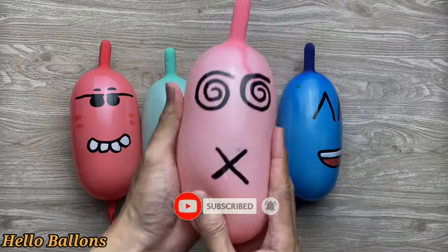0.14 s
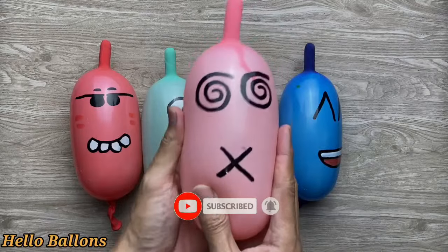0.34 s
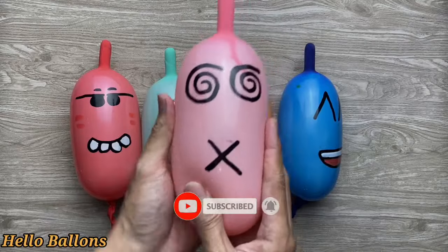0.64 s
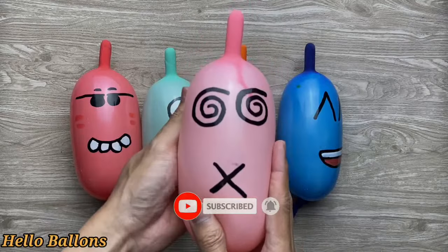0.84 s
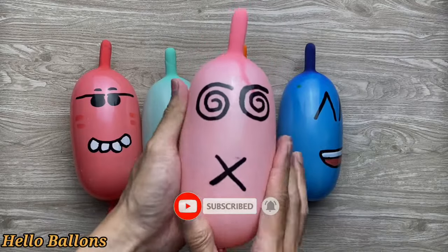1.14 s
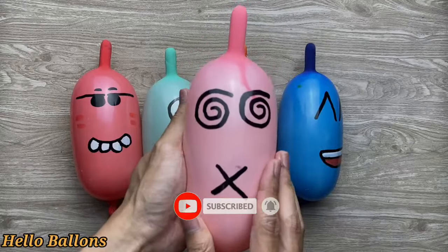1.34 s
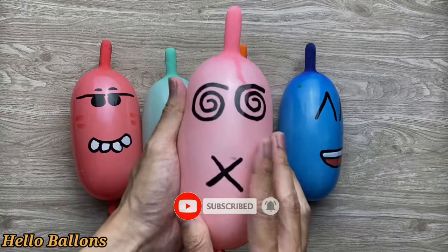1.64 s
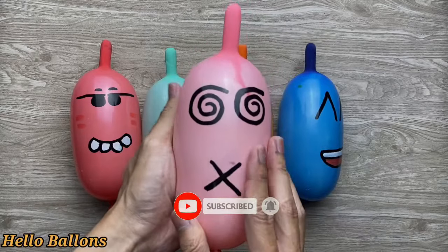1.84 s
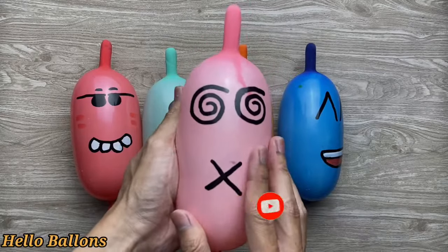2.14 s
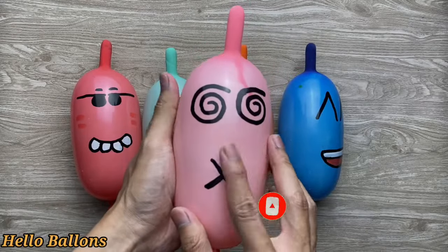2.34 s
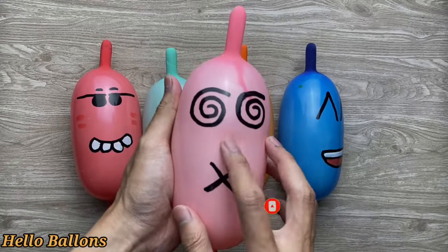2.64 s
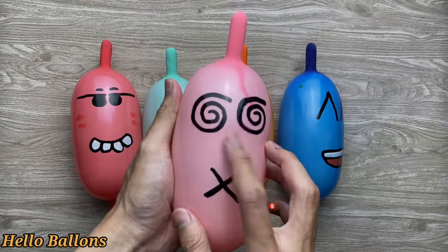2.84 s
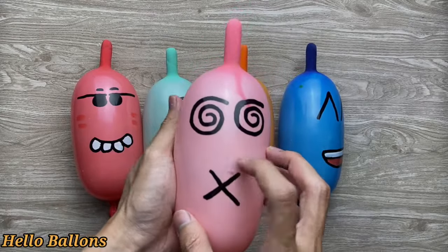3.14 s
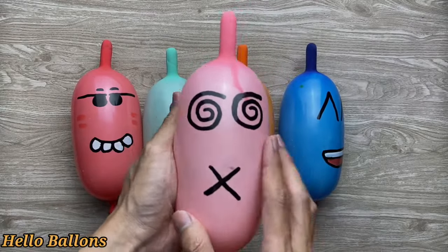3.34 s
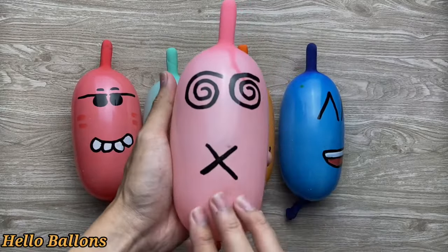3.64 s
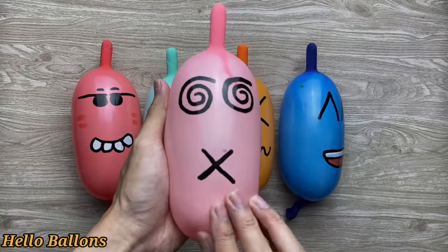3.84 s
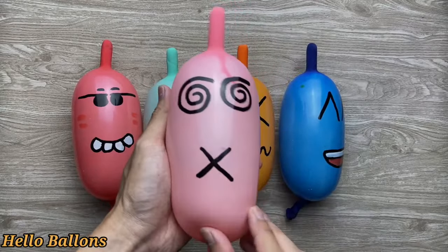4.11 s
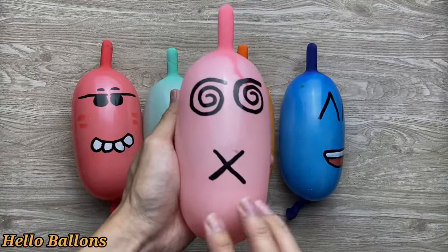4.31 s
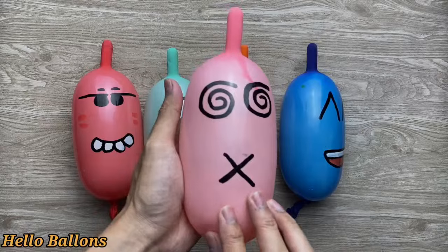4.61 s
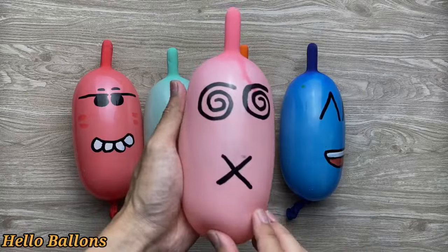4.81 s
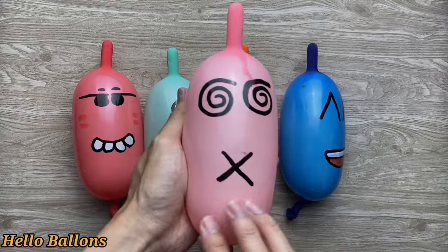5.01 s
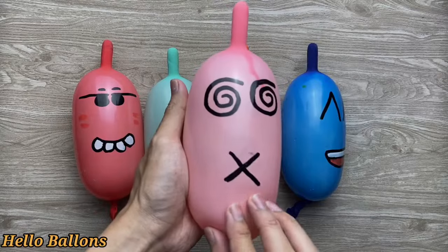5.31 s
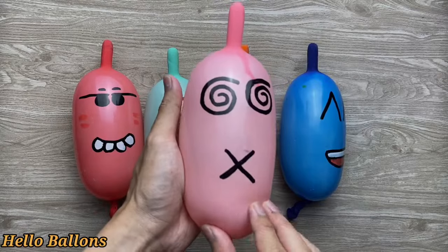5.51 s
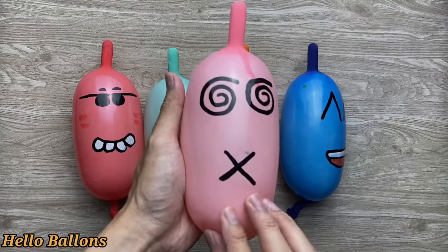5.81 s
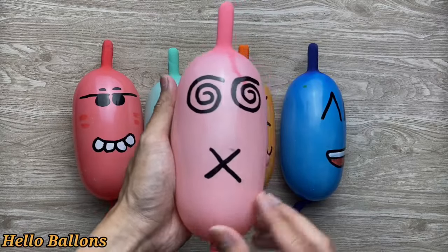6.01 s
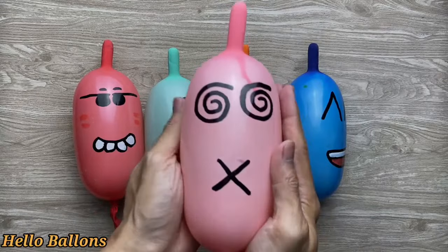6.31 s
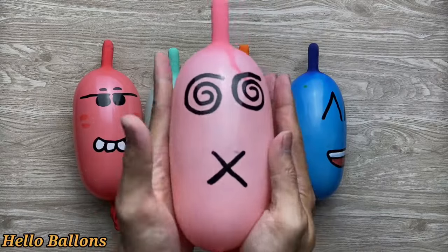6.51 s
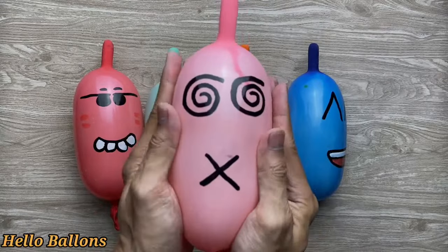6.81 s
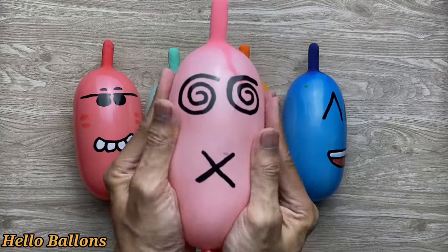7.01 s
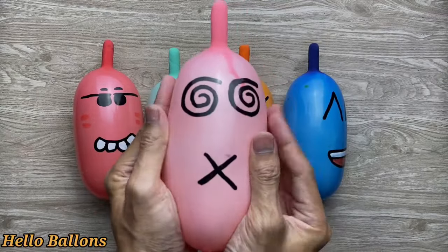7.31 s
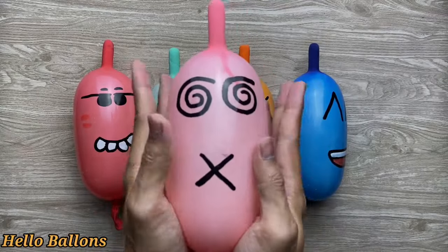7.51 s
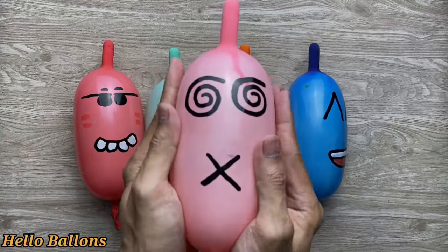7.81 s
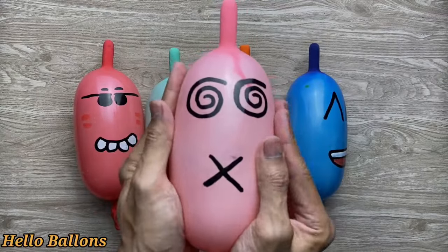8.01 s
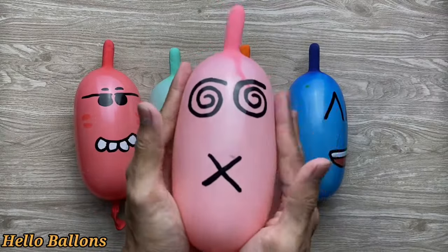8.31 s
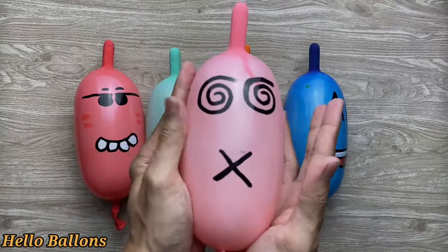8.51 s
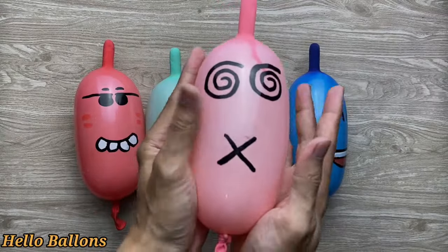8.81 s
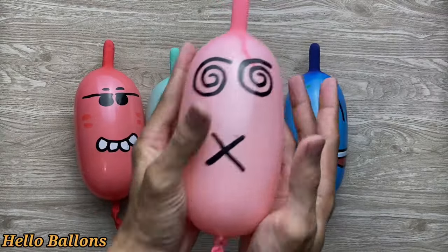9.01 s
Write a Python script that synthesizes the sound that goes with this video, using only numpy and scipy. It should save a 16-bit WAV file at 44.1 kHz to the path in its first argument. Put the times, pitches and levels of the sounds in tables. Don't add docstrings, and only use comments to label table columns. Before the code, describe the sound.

Hands rub, tap and squeeze a taut, filled latex balloon up close, with hollow thumps, rubbery squeaks, creaks and dry friction in a small room.

```python
import sys
import numpy as np
from scipy import signal
from scipy.fft import rfft, irfft, next_fast_len
from scipy.io import wavfile
from scipy.ndimage import uniform_filter1d

SR = 44100
rng = np.random.default_rng(int(sys.argv[2]) if len(sys.argv) > 2 else 0)


def store_pcm(level_fs):
    pcm = np.round(np.clip(level_fs, -1, 1) * 32767).astype(np.int16)
    wavfile.write(sys.argv[1], SR, np.atleast_2d(pcm).T)


def makeup_ratio(level_db):
    decades = np.asarray(level_db, float) / 20
    return 10 ** decades


N = 403497
SIZE = 8192


def on_log(hz, table):
    f, value = np.transpose(table)
    return np.interp(np.log(hz + 1), np.log(f + 1), value)


def unit(x):
    return x / np.sqrt(np.mean(x ** 2))


def walk(rate):
    hold = int(SR / rate)
    steps = np.repeat(rng.standard_normal(N)[:N // hold + 1], hold)
    return unit(uniform_filter1d(steps, hold // 2 + 1)[:N])


# (f/Hz, level/dB per Hz)
HUM_COLOUR = [(18, -28), (30, 7.5), (276, -13.5), (456, -14), (636, -15), (1100, -37.5), (9000, -54),
              (11700, -74.5), (19800, -120)]


def hum():
    hz = np.fft.rfftfreq(N, 1 / SR)
    colour = makeup_ratio(on_log(hz, HUM_COLOUR)) * np.clip((hz - 30) / 15, 0, 1) ** 2
    mid, side = rfft(rng.standard_normal((2, N))) * colour
    side = side * np.clip(hz / 2500 + 0.26, 0, 1)
    level_db = -53.5 + 0.58 * walk(36)
    return unit(irfft(np.array([mid + side, mid - side]), N)) * makeup_ratio(level_db)


# (f/Hz, fade/s)
ROOM_FADE = [(80, .3), (500, .16), (2000, .2)]


def room(x):
    room_db = -19
    t = np.arange(2 * SIZE) / SR
    tail = 0
    for hz in 88 * 2. ** np.arange(8):
        band = signal.butter(2, [hz / 2 ** .5, hz * 2 ** .5], "band", fs=SR, output="sos")
        noise = signal.sosfilt(band, rng.standard_normal((2, len(t))))
        fade = makeup_ratio(-60 * t / on_log(hz, ROOM_FADE))
        tail = tail + noise * fade * np.minimum(t / 0.00086, 1)
    tail = tail / np.sqrt(np.sum(tail ** 2) / 2)
    return signal.fftconvolve(x[None], tail, axes=1)[:, :N] * makeup_ratio(room_db)


# (t/s, length/s, first f/Hz, last f/Hz, level/dB, overtone share 0-1)
SQUEAKS = [(1.887, .0068, 990, 2370, -43, .52), (2.249, .01, 1400, 2440, -52, .45),
           (3.233, .011, 1600, 4300, -45, .15), (3.419, .035, 700, 1340, -37, .3),
           (3.463, .053, 540, 1440, -35, .36), (3.474, .018, 1490, 2150, -42, .3),
           (4.478, .03, 1790, 1740, -46, .05), (5.592, .042, 1620, 1560, -43, .05),
           (5.652, .016, 1500, 800, -47, .1), (5.664, .024, 780, 640, -41, .05),
           (5.583, .012, 900, 1600, -50, .3), (6.322, .045, 2040, 2150, -45, .02),
           (8.482, .006, 4800, 2200, -54, .1), (1.545, .012, 900, 1700, -50, .4),
           (.045, .04, 1580, 1590, -37, .05), (.17, .07, 1570, 1590, -47, .05),
           (.04, .15, 345, 255, -25, .3), (.612, .125, 265, 435, -22, .2),
           (5.46, .085, 1590, 1580, -50, .02), (.39, .12, 410, 420, -34, .1),
           (5.413, .06, 433, 424, -23, .26)]


def squeaks():
    out, shake, flutter = np.zeros(N), walk(570), walk(200)
    for start, length, first_hz, last_hz, db, share in SQUEAKS:
        i = int(start * SR) + np.arange(int(length * SR))
        u = np.linspace(0, 1, len(i))
        wobble = 1 + (.035 + .0011 / length) * shake[i]
        pitch_hz = (first_hz + (last_hz - first_hz) * u) * wobble
        phase = np.cumsum(pitch_hz) * 2 * np.pi / SR
        tone = sum(share ** k * np.sin((k + 1) * phase) for k in range(6))
        swell = np.sin(np.pi * u ** .5) ** .6
        out[i] += makeup_ratio(db + 2 * flutter[i]) * tone * swell
    return out


# (peak t/s, rise/s, fall/s, hollow level/dB, creak level above it/dB)
PRESSES = [(0.826, 0.31, 0.068, -23, -18), (1.195, 0.14, 0.33, -42.5, -4.5),
           (1.701, 0.009, 0.4, -31, -22.5), (1.888, 0.014, 0.078, -54, 3.5),
           (2.055, 0.0056, 0.16, -27, -22), (2.974, 0.12, 0.23, -35, -17), (3.313, 0.0073, 1, -47, -10),
           (3.951, 0.23, 0.22, -29.5, -15.5), (4.294, 0.31, 0.21, -41, -19.5),
           (4.653, 0.24, 0.089, -31.5, -9.5), (4.939, 0.063, 0.055, -32.5, -13),
           (5.342, 0.25, 0.18, -32, -14), (5.595, 0.044, 0.27, -46.5, -5),
           (6.122, 0.12, 0.15, -25.5, -19.5), (5.93, 0.055, 0.13, -27, -8), (.65, .04, 0.22, -39, -29),
           (7.472, 0.0083, 0.15, -37.5, -12.5), (7.971, 0.14, 0.14, -27.5, -15.5),
           (8.09, 0.12, 0.057, -44.5, -6), (8.53, 0.13, 0.14, -36.5, -9), (8.745, 0.063, 0.084, -34, -6.5),
           (8.911, 0.0091, 0.31, -36.5, -13)]
RUBS = [
    (0.635, 0.035, 0.3, -20, -28),
    (.89, .03, 0.2, -38.5, -14),
    (1.278, 0.13, 0.084, -27.5, -35),
    (1.374, .012, 0.28, -44, -21),
    (2.495, 0.034, 0.055, -24.5, -15.5),
    (4.561, 0.0029, 0.56, -25.5, -17.5),
    (5.225, 0.031, 0.34, -24.5, -22.5),
    (5.859, 0.057, 0.14, -13, -17.5),
    (8.014, .1, 0.11, -43, -19),
    (8.265, 0.014, 0.18, -39, -12.5),
]
SKIMS = [
    (1.562, 0.069, 0.026, -44.5, -5.5),
    (2.719, 0.038, 0.075, -35, -11),
    (3.127, 0.04, 0.077, -24.5, -15.5),
    (3.487, 0.4, 0.065, -45, -2),
    (4.243, 0.053, 0.05, -28, -11.5),
    (4.495, 0.028, 0.027, -34.5, -14),
    (6.331, 0.084, 0.087, -22.5, -19),
    (6.43, .03, 0.17, -50, -15),
    (7.861, 0.11, 0.1, -24, -22),
    (8.79, 0.037, 0.36, -57.5, -2.5),
]
DRAGS = [(0.076, 0.073, 0.14, -18.5, -27), (0.354, 0.026, 0.13, -24.5, -23),
         (.82, 0.044, 0.014, -20.5, -29), (7.362, 0.0045, 0.071, -43, -5.5),
         (2.38, 0.0078, 0.067, -38, -15.5), (3.782, 0.042, 0.03, -24, -20.5),
         (3.859, 0.012, 0.19, -29.5, -22), (4.109, 0.015, 0.063, -21, -14), (4.764, 0.033, 0.061, -19, -18),
         (5.181, 0.046, 0.039, -32.5, -19), (5.44, 0.079, 0.063, -21.5, -16),
         (7.129, 0.38, 0.24, -29.5, -18.5), (7.291, 0.24, 0.03, -31.5, -14)]
SWISHES = [(.16, 0.072, 0.066, -47, -13.5), (9.0, 0.1, 0.067, -57, -6), (5.3, 0.043, 0.017, -50, -4.5),
           (1.7, 0.13, 0.063, -58, -16), (0.746, 0.067, 0.065, -60, -3.5), (1.004, 0.35, 0.22, -66, -4.5),
           (2.497, 0.016, 0.032, -43.5, 0.5), (6.2, 0.087, 0.45, -57, -6.5), (4.9, 0.19, 0.08, -43, -14),
           (7.15, 0.34, 0.42, -51.5, -12.5), (6.43, .03, 0.13, -54, -8.5), (2.23, 0.028, 0.11, -58, -14),
           (2.52, .02, 0.083, -62.5, -8), (6.412, 0.0093, 0.0086, -53, 5), (8.28, 0.025, 0.089, -56, -6.5),
           (9.7, 0.044, .1, -57, -1.5), (8.21, 0.089, 0.044, -74, -6), (4.46, 0.028, 0.092, -62, -2),
           (8, 0.038, 0.038, -60, -2), (3.24, .008, 0.038, -58.5, -0.5)]
# (skin waves above hollow/dB, hiss above creak/dB, loss over rise and over fall/dB)
GRIPS = [
    (-2, -13, 36),
    (-7, -13, 25),
    (-13.5, -11.5, 26.5),
    (-6, -15, 10.5),
    (1, 6.5, 16),
]
REST_DB = [-69.5, -70, -101, -98.5]


def strokes():
    let_go_db_s = 2501
    s = np.arange(0, N / SR, .001)
    power = makeup_ratio(2 * np.array(REST_DB))[:, None]
    tables = (PRESSES, RUBS, SKIMS, DRAGS, SWISHES)
    for table, (skin_db, hiss_db, loss_db) in zip(tables, GRIPS):
        peak, rise, fall, db, creak_db = np.transpose(table)[:, :, None]
        away = np.abs(s - peak)
        span = np.maximum(np.where(s < peak, rise, fall), .001)
        db = db - loss_db * away / span - let_go_db_s * np.maximum(away - span, 0)
        shares_db = (skin_db, 0, creak_db, creak_db + hiss_db)
        power = power + np.array([makeup_ratio(2 * (db + share_db)).sum(axis=0) for share_db in shares_db])
    return s, 10 * np.log10(power)


def slips(rate, scatter_db):
    chance = rng.random((2, N))
    size_db = np.minimum(-scatter_db * np.log(1 - chance[1]), 3 * scatter_db)
    jerks = (chance[0] < rate / SR) * makeup_ratio(size_db)
    return unit(jerks - uniform_filter1d(jerks, size=2000))


# (t/s, level/dB)
RELEASES = [(.02, 0.5), (0.046, 12), (.082, -2), (0.103, 3), (0.379, 5), (0.601, 11.5), (.622, 8.5),
            (0.647, 13), (.672, 11.5), (3.755, 6), (3.78, 2.5), (3.919, 0), (3.941, 5.5), (3.962, 10.5),
            (4.6, -2.5), (4.629, -11), (4.651, 4), (4.76, 8.5), (5.17, 6), (5.184, 5.5), (5.213, 3.5),
            (5.251, 7), (5.267, 8), (5.295, 1.5), (5.334, -1), (5.408, 0), (5.426, -7), (5.447, 2),
            (5.47, 5), (5.49, 5.5), (6.741, 10.5), (6.759, 0.5), (6.778, 1.5), (6.81, -1), (6.839, 9),
            (6.861, 6.5), (6.883, 5), (6.905, 8), (6.937, 4.5), (6.963, 8.5), (6.988, 8.5), (7.008, 6),
            (7.031, 8), (7.057, 4.5), (7.078, 7.5), (7.102, 4.5), (7.124, 10), (7.146, 4.5), (7.169, 6),
            (7.215, 4.5), (7.24, 2), (7.279, -2), (7.318, 1)]


def patches(light, rate, fall_db):
    settle_s = .05
    chance, i = rng.random((2, N)), np.arange(N)
    pace = np.exp(.45 * unit(uniform_filter1d(chance[0] - .5, size=900)))
    stray = np.diff(np.floor(np.cumsum(pace * rate / SR)), prepend=0) > 0
    known_s, known_db = np.transpose(RELEASES + [(s, 3.4) for s, _, _ in LANDINGS])
    at = (known_s * SR).astype(int)
    known, size_db = np.zeros(N, bool), 1.7 * chance[1]
    known[at], size_db[at] = True, known_db
    since = i - np.maximum.accumulate(np.where(known, i, -N))
    released = known | stray & (since > settle_s * SR)
    last = np.maximum.accumulate(np.where(released, i, 0))
    quieter_db = np.maximum(-fall_db * (i - last) * rate / SR, -18)
    return makeup_ratio(light * (quieter_db + size_db[last] + 3.0))


# (t/s, hollow level/dB, sharpness above it/dB)
THUDS = [(.414, -24, -20), (1.173, -17.5, -26), (1.216, -14, -32), (1.444, -30.5, -31), (1.688, -11.5, -41),
         (1.709, -10, -32), (1.798, -21, -29), (2.05, -9.5, -46), (2.125, -16.5, -29), (2.469, -24, -15),
         (2.652, -30.5, -16), (2.928, -19.5, -17), (3.286, -36, -24), (3.747, -33, -5), (3.903, -26, -13),
         (4.002, -18.5, -15.5), (4.098, -16.5, -21), (4.188, -18, -22.5), (4.271, -20, -20),
         (4.557, -29.5, -34), (5.389, -21.5, -18), (6.091, -23, -31), (6.418, -23, -10.5),
         (6.817, -24, -31), (7.847, -10.5, -25), (8.499, -16.5, -20), (8.534, -21, -16),
         (8.707, -9.5, -24.5), (8.907, -14, -38), (8.938, -16.5, -20)]
PATS = [(0.326, -28.5, -15), (0.867, -13.5, -25.5), (0.908, -10.5, -38), (1.255, -16, -40),
        (1.286, -17, -27), (1.374, -8.5, -36.5), (1.732, -15, -33), (1.746, -14.5, -33), (1.766, -16, -33),
        (2.089, -15, -36), (2.868, -25, -22), (3.034, -16, -30), (3.08, -17, -25), (3.115, -18, -21),
        (3.315, -5.5, -30), (3.344, -13, -37), (3.656, -34, -26), (3.843, -30.5, -30), (4.303, -18.5, -25),
        (4.689, -17.5, -11.5), (4.887, -8, -33), (4.922, -15.5, -45), (6.076, -21.5, -41),
        (6.314, -20.5, -29), (7.976, -12, -37), (8.265, -20, -16.5), (8.328, -20.5, -16),
        (8.456, -29.5, -18.5), (8.515, -12.5, -34), (8.733, -14.5, -24)]
KNOCKS = [(0.344, -11.5, -31), (.449, -12.5, -26.5), (0.483, -16.5, -15.5), (.807, -10, -32),
          (1.142, -28, -9), (1.314, -10, -36), (2.356, -29, -16.5), (2.713, -24.5, -33), (2.998, -17, -42),
          (3.057, -14.5, -25), (3.174, -41.5, 4), (3.357, -11.5, -28), (3.392, -16.5, -42),
          (4.736, -11.5, -18.5), (5.146, -32, -8.5), (5.367, -16.5, -42), (5.672, -29, -37),
          (5.771, -25.5, -19.5), (5.807, -29, -19), (5.82, -13, -25), (6.023, -34, 2), (6.159, -16, -28),
          (6.215, -23, -51), (7.728, -25, -27), (7.769, -25, -31), (7.8, -16, -33), (7.947, -9.5, -38),
          (8.672, -32, -24), (8.859, -29, -24), (9.025, -29.5, -32)]
SHOVES = [
    (7.251, -22.5, -27),
    (7.273, -25, -18),
    (7.297, -26, -24),
    (7.317, -36.5, -13),
    (7.863, -23.5, -31),
    (4.794, -29.5, -25),
]
FOLLOWERS = [(1.183, -12, -30), (1.222, -14.5, -28), (1.262, -10, -37), (1.278, -13.5, -31),
             (1.295, -13, -35), (2.062, -14.5, -30), (2.075, -28, -37), (2.919, -25, -16),
             (2.969, -16.5, -37), (2.977, -22, -38), (3.006, -18.5, -29), (3.027, -14.5, -33),
             (3.051, -23, -24), (3.122, -24, -33), (4.112, -12, -22), (6.111, -24, -25), (6.193, -33, -29),
             (6.25, -24, -25), (6.295, -26.5, -25), (8.278, -25, -22), (8.715, -13, -17.5),
             (8.741, -16.5, -20), (8.947, -18.5, -21), (8.975, -32, -33), (9.059, -33, -40),
             (1.694, -17, -30), (4.893, -17, -26), (7.354, -39, -24), (0.424, -19, -30), (.459, -22.5, -37),
             (0.466, -21, -37), (0.495, -19.5, -29), (.829, -14, -30), (0.993, -34.5, -27),
             (2.447, -25, -21), (2.457, -35, -26), (2.481, -24.5, -16), (5.782, -26, -18),
             (5.829, -18.5, -20), (6.573, -38, -31), (6.63, -39, -31), (7.738, -29.5, -25.5),
             (7.793, -30, -30), (7.805, -35, -34), (7.829, -17, -30), (7.891, -16.5, -32),
             (7.917, -26.5, -17), (7.955, -18.5, -30), (8.041, -38, -10), (8.073, -32.5, -9),
             (2.94, -23, -11.5), (4.121, -17, -26), (4.812, -14.5, -22), (3.25, -38, -23),
             (4.5, -34.5, -17), (1.457, -34, -26), (5.95, -19, -16.5), (6.35, -24, -16), (5.437, -12, -28),
             (6.78, -25.5, -35)]
LANDINGS = THUDS + PATS + KNOCKS + SHOVES + FOLLOWERS


def taps(part_db, early_s, spread_s, fade_db):
    chance, order = rng.random((len(part_db), 16)), np.arange(8)
    at = np.array(LANDINGS)[:, :1] - early_s + spread_s * order * chance[:, :8]
    gain = makeup_ratio(part_db[:, None] - fade_db * order - 0.79 * chance[:, 8:] * (order > 0))
    out = np.zeros(N)
    np.add.at(out, np.clip((at * SR).astype(int), 0, N - 1), gain)
    return out


# (f/Hz, width/Hz, level/dB)
RINGS = [(413.5, 23, 2.5), (680, 130, 2), (1580, 70, 11), (2930, 120, 8), (3150, 80, 5), (5030, 60, 3)]


def response(colour, late_s, wrap_s, wrap, ring, tuning):
    hz = np.fft.rfftfreq(SIZE, 1 / SR)
    rings_db = sum(g / (1 + (2 * (hz - f) / w) ** 2) for f, w, g in RINGS)
    db = on_log(hz / tuning, colour) + ring * rings_db
    fold = irfft(np.log(makeup_ratio(np.maximum(db, -75))))
    fold[1:SIZE // 2] *= 2
    fold[SIZE // 2 + 1:] = 0
    delay_s = late_s * (300 / np.maximum(hz, 70)) ** 1.0468
    turn = -2j * np.pi * np.cumsum(delay_s) * SR / SIZE
    round_back = wrap * np.exp(0.6406 * turn - hz / 5000 - 2j * np.pi * hz * wrap_s)
    h = irfft(np.exp(rfft(fold) + turn) * (1 + round_back))
    return h / np.sqrt(np.sum(h ** 2))


# (start t/s, end t/s)
ON_RINGING_SPOT = [(0, .6), (.6, .75), (5.15, 5.5), (4.55, 4.85), (5.93, 6), (1.37, 1.5), (1.75, 1.83),
                   (2.92, 2.97), (4.1, 4.2), (3.75, 3.85), (8.25, 8.36)]
# (start t/s, end t/s, number of the spot left free)
ON_DULL_SPOT = [
    (5.8, 5.92, 3),
    (6.72, 7.6, 1),
    (7.05, 7.34, 3),
    (.76, .86, 3),
    (1.16, 1.25, 1),
    (1.68, 1.74, 1),
    (2.04, 2.16, 1),
]


def touch_shares():
    touch = np.exp(2 * np.array([walk(9) for _ in SPOTS]))
    stays = [(start, end, 0) for start, end in ON_RINGING_SPOT] + list(ON_DULL_SPOT)
    for start, end, spot in stays:
        touch[int(spot), int(start * SR):int(end * SR)] *= 60
    touch = uniform_filter1d(touch / touch.sum(axis=0), size=300)
    return np.sqrt(touch / touch.sum(axis=0))


# (f/Hz, level/dB per Hz)
SKIN = [(50, -32), (90, -17.5), (150, -3.5), (250, 0), (340, -0.5), (420, -3), (480, -9.5), (620, -31.5),
        (1060, -100)]
HOLLOW = [(280, -54), (480, -17.5), (518, -11.5), (610, 5), (720, 1), (1150, -18.5), (1500, -29.5),
          (2530, -120)]
CREAK = [(680, -16.5), (1150, 9), (1430, -9), (1590, -1.5), (1920, -9.5), (2900, -4.5), (4680, -22),
         (7920, -120)]
HISS = [(2100, -30), (3900, -8), (7900, -10), (8500, -24), (9200, -8), (11300, -10), (11900, -42),
        (12300, -42), (12900, -15), (15000, -14), (15700, -60)]
# (relative path length, way round the back/s, its gain, share of the rings,
# left lead/s, left minus right level/dB)
SPOTS = [
    (.6, .0031, .15, 1.2, .00002, 1.5),
    (1., .0012, -.5, .3, -.00005, -2),
    (1.4, .0052, .5, .9, .00008, 1),
    (.3, .0021, -.5, .4, 0, -.5),
]
SPOT_TUNING = [1.044, 0.8997, 0.9834, 1.113]
WEIGHT_DB = [
    4.5,
    -1,
    -7.5,
    15.5,
    -3.2,
]


def balloon(size):
    s, levels = strokes()
    t = np.arange(N) / SR
    _, blow_db, sharp_db = np.transpose(LANDINGS)
    counts = [len(THUDS), len(PATS), len(KNOCKS), len(SHOVES), len(FOLLOWERS)]
    skin_db = np.repeat(WEIGHT_DB, counts)
    light = np.clip((-22 - np.interp(t, s, levels[1])) / 10, .25, 1)
    coarse, fine = slips(800, 3.57), slips(6000, 3.7)
    patch = patches(light, 55, 13.8)
    touch = touch_shares()
    # (colour, lateness/s, share of fine slips, tap level/dB, landing spread/s, fade/dB per step, push/s)
    parts = [(SKIN, .005, .1, blow_db + skin_db + 11, .003, 4, .004),
             (HOLLOW, .004, .25, blow_db + 15.5, .0015, 5.5, 0),
             (CREAK, .002, .6, blow_db + sharp_db + 13.0, .003, 2.5, 0),
             (HISS, .001, .9, blow_db + sharp_db + 1.5, .0011, 2.5, 0)]
    out = 0
    for db, (colour, late_s, share, tap_db, spread_s, fade_db, push_s) in zip(levels, parts):
        catch, follow = (.3, .25) if colour is HISS else (.6, 1)
        grain = np.sqrt(1 - share) * coarse * patch + np.sqrt(share) * fine * patch ** catch
        rub = grain * makeup_ratio(np.interp(t, s, db))
        blows = taps(tap_db, late_s / 2, spread_s, fade_db)
        if push_s > 0:
            pad = np.hanning(int(2 * push_s * SR) + 3)
            blows = blows + 6.53 * np.convolve(blows, pad / pad.sum())[:N]
        answers = [response(colour, late_s * far, wrap_s, wrap, ring, tuning ** follow)
                   for (far, wrap_s, wrap, ring, _, _), tuning in zip(SPOTS, SPOT_TUNING)]
        out = out + rfft(touch * (rub + blows), size) * rfft(np.array(answers), size)
    return out


# (f/Hz, phase/radians)
PORT_LEAD = [(0, .15), (650, .62), (1290, .9), (1640, .3), (3190, 2.2), (4220, -.4), (6550, .2),
             (9730, -5.9), (15400, -15.8)]
# (f/Hz, left minus right level/dB)
PORT_TILT = [(200, .5), (600, 0), (1290, 3.2), (2500, 1.5), (4400, 2.5), (8120, 0)]


def scene():
    size = next_fast_len(N + SIZE)
    hz = np.fft.rfftfreq(size, 1 / SR)
    spots = balloon(size)
    spots[0] += rfft(squeaks(), size)
    lead_s, pan_db = np.transpose(SPOTS)[4:, :, None]
    lead = np.interp(hz, *np.transpose(PORT_LEAD)) + 2 * np.pi * hz * lead_s
    port = makeup_ratio((on_log(hz, PORT_TILT) + pan_db) / 2) * np.exp(.5j * lead)
    left, right = np.sum(spots * port, axis=0), np.sum(spots / port, axis=0)
    ports = irfft(np.array([left, right]), size)[:, :N]
    return ports + room(irfft(spots.sum(axis=0), size)[:N]) + hum()


def band_limit(x):
    return signal.sosfilt(signal.butter(12, 16500, fs=SR, output="sos"), x)


def record(dry):
    top = .42
    cut = signal.sosfilt(signal.butter(4, 38, "high", fs=SR, output="sos"), dry)
    return band_limit(top * np.tanh(cut / top))


dry = scene()
out = record(dry)
store_pcm(out)
```